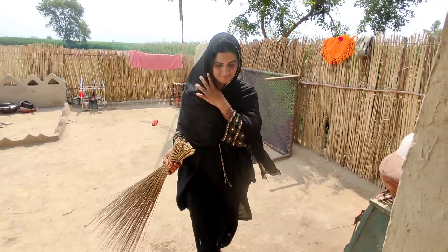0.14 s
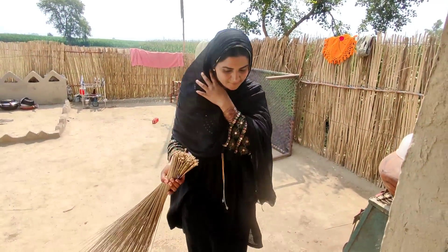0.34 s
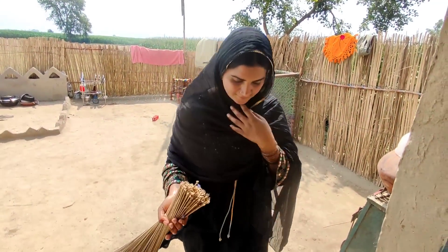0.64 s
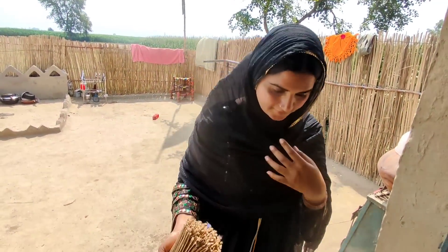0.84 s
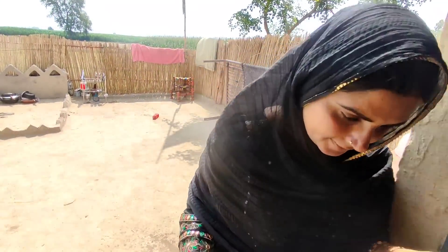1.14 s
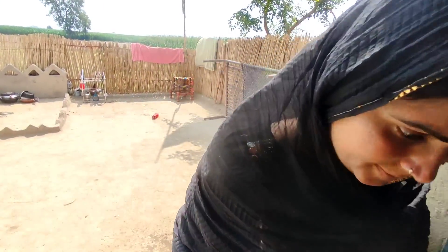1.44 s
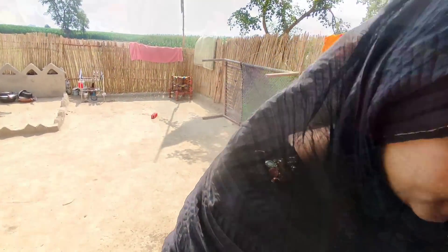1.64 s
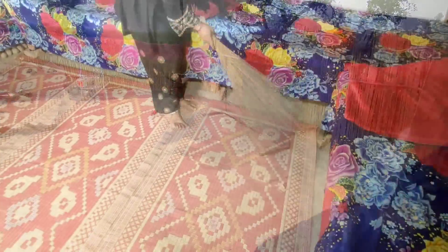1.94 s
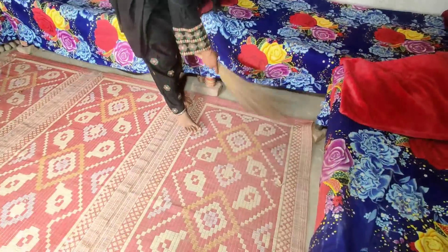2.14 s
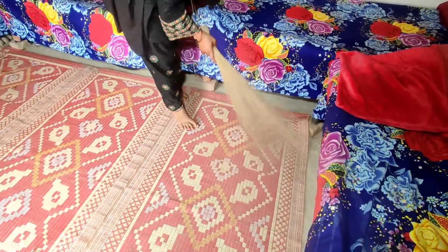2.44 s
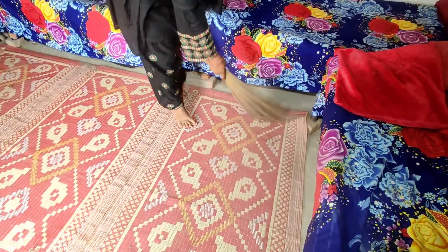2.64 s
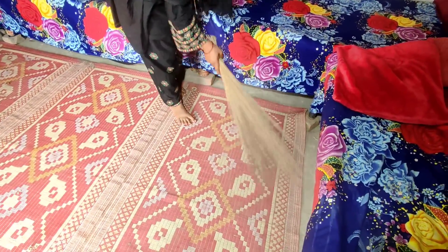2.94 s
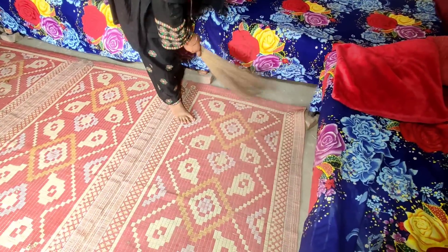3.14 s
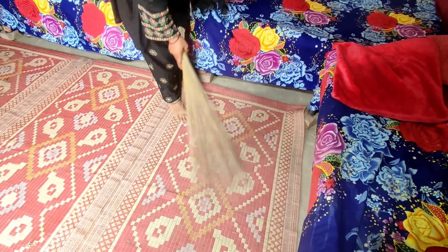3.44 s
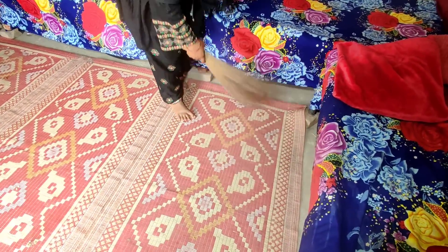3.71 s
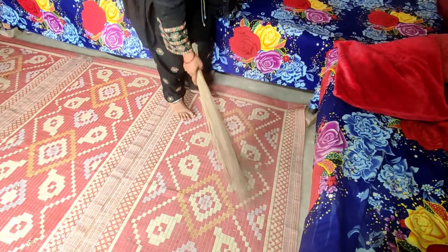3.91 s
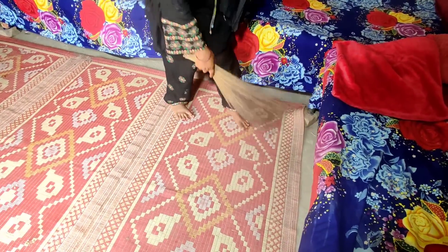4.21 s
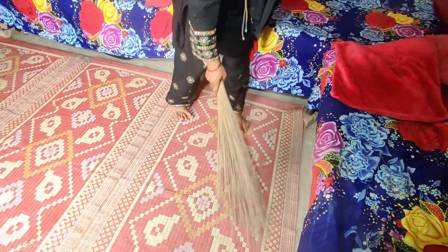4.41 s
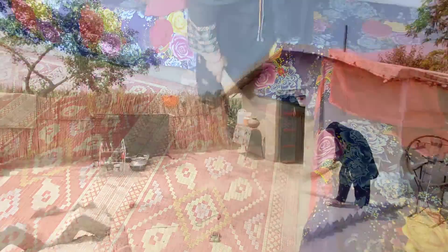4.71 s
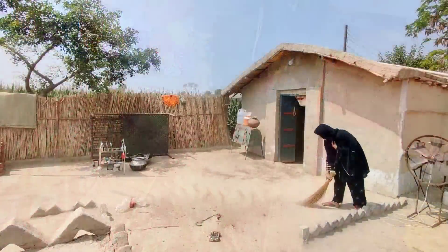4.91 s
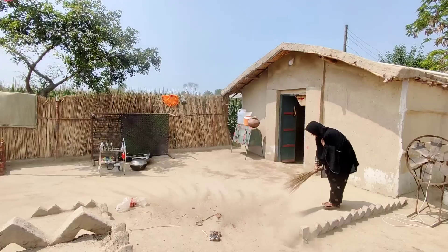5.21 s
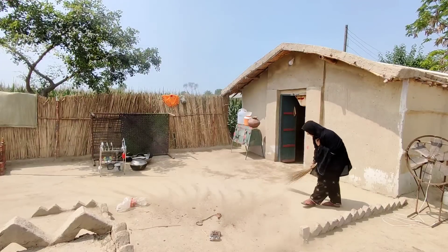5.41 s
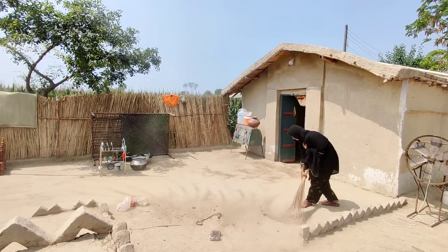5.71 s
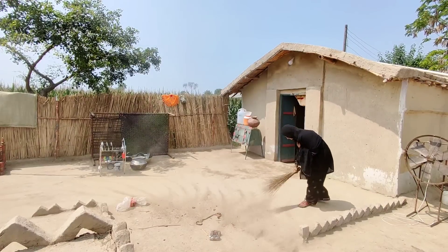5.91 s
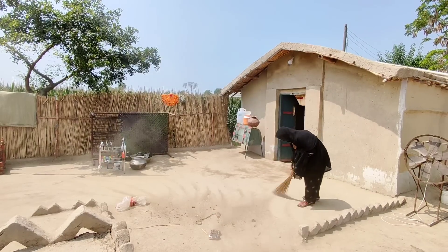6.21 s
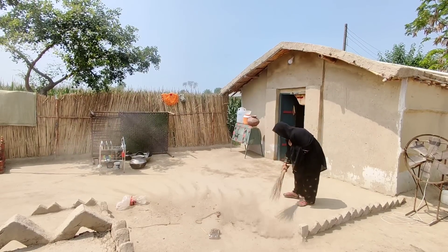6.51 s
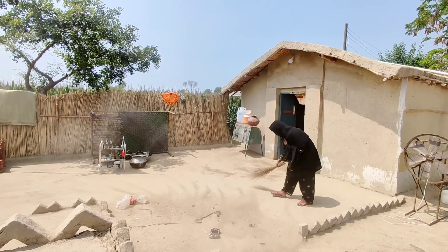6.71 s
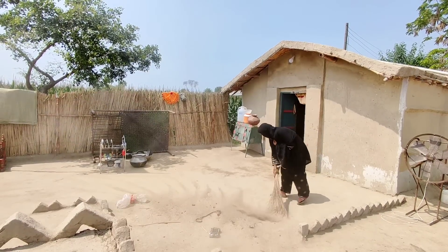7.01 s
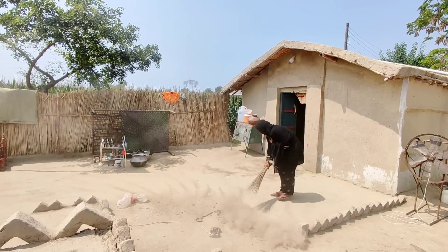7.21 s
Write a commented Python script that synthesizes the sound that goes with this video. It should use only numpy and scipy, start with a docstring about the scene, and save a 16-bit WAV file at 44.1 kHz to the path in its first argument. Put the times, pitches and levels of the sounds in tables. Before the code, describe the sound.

A grass broom sweeps briskly over a woven mat in a small room, then more faintly over packed earth outdoors.

```python
"""Sweeping a room, then a courtyard.

Close to a stereo microphone, a grass broom sweeps briskly over a woven floor mat: the tips hiss, the stalks
rasp. The room is small, and a ceiling fan hums and throbs. It fades into an open courtyard, where the broom,
farther off, scratches over packed earth. Before the sweeping come a few handling taps, a footstep and one
faint, distant bird call. Low drones swell far away, and a draught puffs on the microphone."""
import sys
import numpy as np
from scipy import signal
from scipy.fft import rfft, irfft, next_fast_len
from scipy.io import wavfile
from scipy.ndimage import uniform_filter1d, map_coordinates

SR = 44100
rng = np.random.default_rng(int(sys.argv[2]) if len(sys.argv) > 2 else 0)


def unload_wav(signal):
    """Save mono or channel-first audio to the path in sys.argv[1] as 16-bit WAV at rate SR, clipped to [-1, 1]."""
    wavfile.write(
        sys.argv[1],
        SR,
        np.round(np.clip(np.atleast_2d(signal).T, -1, 1) * 32767).astype(np.int16),
    )


N = 324165
TIME = np.arange(N) / SR

# Strokes on the mat. Each row: fastest moment, rise and fall in seconds, level and stalk rasp in dB.
MAT_STROKES = [(1.885, 0.086, 0.1, -33, -0.5), (2.385, 0.12, 0.099, -21, -1.5),
               (2.912, 0.14, 0.059, -19.5, 1), (3.435, 0.13, 0.079, -19.5, -2),
               (3.938, 0.077, 0.098, -20, -1), (4.431, 0.077, 0.11, -22, 0), (4.9, 0.057, 0.14, -31, -3)]
# Strokes on earth. Each row: fastest moment, rise and fall in seconds, level in dB.
YARD_STROKES = [(5.005, 0.073, 0.18, -38), (5.733, 0.11, .121, -38.5), (6.367, 0.088, 0.15, -38),
                (7.032, 0.09, 0.14, -37.5)]
# Light drags between strokes. Each row: middle and length in seconds, level in dB.
MAT_DRAGS = [(1.51, 0.15, -53), (1.74, 0.12, -42), (2.1, 0.59, -44.5), (2.68, 0.12, -36), (3.02, 0.12, -35),
             (3.19, 0.12, -33), (3.57, .11, -36), (4.12, 0.43, -39), (4.61, 0.046, -41.5)]
YARD_DRAGS = [(5.58, .05, -55), (5.9, 0.2, -54), (7.27, 0.13, -59)]
# Colour of the brushing at the microphone. Each row: frequency in Hz, left and right gain in dB.
MAT_COLOUR = [(400, -31.5, -26), (730, -29.5, -33), (1385, -21.5, -21.5), (2140, -17, -10.5),
              (4000, -16, -9), (4600, -16, -12), (5780, -13.5, -9.5), (6800, -15.5, -2.5), (7250, -10, 0.5),
              (8410, -13.5, -13.5), (9200, -13.5, -14.5), (9560, -31, -10.5), (10900, -17.5, -14),
              (12800, -15.5, -13.5)]
EARTH_COLOUR = [(400, -20.5, -20), (800, -13.5, -17), (1390, -12, -15), (1830, -2.5, -6.5),
                (2720, -9.5, -8.5), (3540, -7.5, -5), (4350, -6, -5.5), (6360, -3, -1), (7400, -4.5, -1.5),
                (8700, 2, -21), (9600, -9.5, -7.5), (10850, -9, -15.5), (13050, 0, -4.5),
                (14900, -16, -15.5)]
# Dry handling taps and the thud of a footstep. Each row: start in seconds, relative peak in dB, centre in Hz,
# width in octaves, # seconds to fall 60 dB, left over right in dB.
TAPS_AND_THUD = [(.1305, -27.5, 1310, 1.34, 0.0057, -13.5), (.518, -29, 2760, 0.61, 0.045, -6),
                 (1.331, -34, 394, 1.7, .14, 0), (1.629, -43.5, 2200, 0.55, .025, -9),
                 (6.065, -38.5, 1900, 1, 0.026, 5)]
# Bangles tink and sandals scuff the earth. Each row: start in seconds, relative peak in dB.
BANGLE_TINKS = [(.14, -49), (.382, -56)]
SANDAL_SCUFFS = [(5.893, -39.5), (5.941, -43.5), (6.655, -51), (7.289, -44.5)]
# Cloth and straw, and the scuff of a footstep. Each row: middle in seconds, level in dB, half length in
# seconds, centre in Hz.
RUSTLES = [(0.212, -61, 0.032, 6960), (.775, -67.5, 0.043, 6500), (.917, -57.5, 0.024, 6800),
           (1.03, -68.5, .098, 6750), (1.347, -44.5, 0.018, 2720)]
# The room's echo. Each row: frequency in Hz, seconds to fall 60 dB.
WALL_DECAY = [(200, 0.097), (2000, 0.23), (12000, 0.15)]
# The fan's blades. Each row: time in seconds, turns made.
FAN_TURNS = [(-.25, -1), (1.96, 6), (2.34, 7), (5.17, 16)]
# The fan's rush. Each row: time in seconds, level in dB.
FAN_RUSH_LEVEL = [(1.8, -55), (2.3, -51), (3.5, -50.5), (4.6, -54)]
# Air indoors, outdoors and on the microphone. Each row: frequency in Hz, relative level in dB.
ROOM_AIR = [(60, -24.5), (110, -20), (175, -3.5), (250, -7.5), (330, -7), (420, -13), (700, -14.5),
            (1400, -16), (2000, -18.5), (3000, -23), (5000, -29), (7300, -27.5), (9000, -38.5),
            (14400, -38.5)]
YARD_AIR = [(100, -15), (200, -13.5), (320, -14.5), (600, -18), (1200, -20), (1700, -19.5), (2500, -21),
            (4000, -24.5), (8000, -36), (14400, -49)]
DRAUGHT_RUMBLE = [(10, -1), (20, 3), (45, -3.5), (65, -10.5), (85, -14), (130, -22.5), (200, -53),
                  (400, -90)]
# Puffs of air on the microphone. Each row: middle and half length in seconds, level in dB.
PUFFS = [(.6, 1, -50.5), (2.2, 0.11, -48), (4.053, 0.13, -42), (4.467, 0.21, -42), (5.103, .2, -47),
         (6.477, 0.094, -48.5), (7.1, .25, -57)]
# Far drones. Each row: middle and half length in seconds, pitch in Hz, level in dB.
DRONES = [(.8, 1.14, 84.2, -61), (0.898, 1.4, 149.4, -60.5), (5.896, 0.94, 64.1, -53)]
# How alike left and right are. Each row: frequency in Hz, likeness from 0 to 1.
ROOM_LIKENESS = [(30, 0.58), (65, 0.62), (110, 1), (200, 1), (400, 1), (800, 0.45), (1400, 0.083),
                 (2400, 0.23), (4000, 0.014)]
YARD_LIKENESS = [(100, 0.45), (300, 0.77), (1400, 0.35), (5000, 0)]


def mat_broom(gain_db=0.93, resting_db=-47.5, firm_db=-23, ease_db_per_s=22, drag_rasp_db=1):
    """Quick strokes close to the microphone; between them the tips never quite leave the mat."""
    strokes = [stroke_power(s, rise, fall, db) for s, rise, fall, db, _ in MAT_STROKES]
    light = drag_power(MAT_DRAGS) + amp(resting_db) ** 2 * np.interp(TIME, [1.64, 1.72], [.1, 1])
    power = sum(strokes) + light
    level_db = 10 * np.log10(power)
    # the stalks bite as a stroke begins and ease off as it follows through
    bite = sum(stroke * (rasp_db - ease_db_per_s * (TIME - s))
               for stroke, (s, *_, rasp_db) in zip(strokes, MAT_STROKES))
    pressure_db = (bite + drag_rasp_db * light) / power
    speed_db = np.maximum(level_db - firm_db, -18)
    friction = bristles(level_db, flicks_per_s=10000, scatter_db=3.5, hiss=1.33, judder_db=0.72)
    friction = stalk_rings(friction, patchy_db=2.0)
    # slow or hard-pressed stalks rasp; a fast stroke draws a thin zing from the weave
    sound = brush(friction, MAT_COLOUR, ROOM_LIKENESS, pressure_db - 0.035 * speed_db, split_hz=2760)
    sound = lifted(sound, 0.25 * speed_db, centre_hz=6900, octaves=0.3)
    fade = np.interp(TIME, [1.4, 1.45, 4.95, 5.06], [0, 1, 1, 0])
    return fade * amp(level_db + gain_db) * sound


def yard_broom(resting_db=-68, trail_db=-22, trail_stretch=2.1, firm_db=-43, dust_db=3):
    """Slower strokes, farther off, through dust on hard earth; stray tips touch early and trail late."""
    strokes = sum(stroke_power(s, rise, fall, db)
                  + stroke_power(s, trail_stretch * rise, trail_stretch * fall, db + trail_db)
                  for s, rise, fall, db in YARD_STROKES)
    level_db = 10 * np.log10(strokes + drag_power(YARD_DRAGS) + amp(resting_db) ** 2)
    rise_db_per_s = np.gradient(uniform_filter1d(level_db, size=4000)) * SR
    landing = np.clip(rise_db_per_s / 150, 0, 1)
    friction = bristles(level_db, flicks_per_s=12000, scatter_db=3.5, hiss=1.33, judder_db=0.73)
    friction = stalk_rings(friction, patchy_db=2.5)
    sound = brush(friction, EARTH_COLOUR, YARD_LIKENESS, -dust_db * landing, split_hz=700)
    # the tips land first with a bright, dusty hiss; the trailing drag is dull
    bright_db = 2 * dust_db * landing + 0.072 * np.minimum(level_db - firm_db, 0)
    sound = lifted(sound, bright_db, centre_hz=13600, octaves=0.18)
    return np.interp(TIME, [4.86, 4.96], [0, 1]) * amp(level_db) * sound


def stroke_power(s, rise, fall, db, ends_down_db=10):
    """One pass of the broom: it gathers speed, peaks and slows."""
    return amp(db - ends_down_db * ((TIME - s) / np.where(TIME < s, rise, fall)) ** 2) ** 2


def drag_power(rows):
    """Light, even drags of the broom between strokes."""
    return sum(stroke_power(s, length / 2, length / 2, db) for s, length, db in rows)


def bristles(level_db, flicks_per_s, scatter_db, hiss, judder_db):
    """Straw tips catch and flick free, more of them in a harder stroke, over a smooth sliding hiss."""
    rate = flicks_per_s * amp((level_db - level_db.max()) / 4)
    caught = rng.random(N) < rate / SR
    size = amp(scatter_db * (2 * rng.random(N) - 1))
    ticks = unit(caught * size * rng.standard_normal((2, N)) / np.sqrt(rate))
    friction = unit(ticks + hiss * rng.standard_normal((2, N)))
    # whole tufts judder as the bundle drags
    return friction * amp(judder_db * (wobble(220) + wobble(45) / 2))


def stalk_rings(friction, patchy_db):
    """Ever different stalks bend and ring, so narrow bands of the brushing come and go."""
    bands = signal.stft(friction, nperseg=1024)[2]
    patches = uniform_filter1d(rng.standard_normal(bands.shape), size=4, axis=1)
    patches = uniform_filter1d(patches, size=9, axis=2)
    return signal.istft(bands * amp(patchy_db * unit(patches)), nperseg=1024)[1][:, :N]


def brush(friction, colour, likeness, rasp_db, split_hz):
    """Fine tips give the hiss, stiffer stalks the rasp below the split."""
    wide = stereo(friction, likeness)
    sound = unit(filtered(wide, lambda hz: amp([along(colour, hz, 1), along(colour, hz, 2)])))
    rasp = filtered(sound, lambda hz: 1 / (1 + (hz / split_hz) ** 6))
    return sound + (amp(rasp_db) - 1) * rasp


def small_contacts(gain_db=-3):
    """Handling taps, a footstep's thud, tinks of bangles and scuffs of sandals."""
    taps = sum(contact(*row) for row in TAPS_AND_THUD)
    tinks = sum(contact(s, db, centre_hz=10100, octaves=.07, t60=0.12) for s, db in BANGLE_TINKS)
    scuffs = sum(contact(s, db, centre_hz=1610, octaves=0.57, t60=0.14, side_db=9.5)
                 for s, db in SANDAL_SCUFFS)
    return amp(gain_db) * (taps + tinks + scuffs)


def contact(s, db, centre_hz, octaves, t60, side_db=0):
    """A short dry contact: a burst that dies in its own band."""
    age = np.arange(SR // 4) / SR
    lead = SR // 100  # samples for the band to ring ahead of the burst
    noise = rng.standard_normal(len(age)) + rng.standard_normal((2, len(age)))
    burst = np.pad(noise * amp(-60 * age / t60), [(0, 0), (lead, 0)])
    band = hump(np.fft.rfftfreq(SR // 2, 1 / SR), centre_hz, octaves)
    tap = irfft(rfft(burst, SR // 2) * band)
    tap = amp(db) * pan(side_db) * tap / np.abs(tap).max()
    return np.pad(tap, [(0, 0), (round(s * SR) - lead, N)])[:, :N]


def rustles(octaves=1.6, side_db=-7):
    """Cloth and straw shift softly and a foot scuffs, right of the microphone, before the work starts."""
    friction = bristles(np.zeros(N), flicks_per_s=1500, scatter_db=5, hiss=0.99, judder_db=1.0)
    return pan(side_db) * sum(
        amp(db) * swell(s, half) * unit(filtered(friction, lambda hz: hump(hz, centre_hz, octaves)))
        for s, db, half, centre_hz in RUSTLES)


def bird(start_s=.89, length_s=0.25, pitch_hz=1400, arch_hz=140, rough_hz=95, db=-54, side_db=3):
    """One hoarse, arching call from far away, a little to the left."""
    arch = np.sin(np.pi * np.clip((TIME - start_s) / length_s, 0, 1))
    phase = 2 * np.pi * np.cumsum(pitch_hz + arch_hz * arch + rough_hz * wobble(700)) / SR
    return pan(side_db) * amp(db + 0.67 * wobble(150)) * np.sqrt(np.abs(arch)) * np.sin(phase)


def walls(sound):
    """The short answer of a small room's walls, lingering longest in the midrange."""
    hz, age, bands = signal.stft(rng.standard_normal((2, SR // 2)), SR, nperseg=256)
    decay = amp(-60 * age / along(WALL_DECAY, hz)[:, None])
    tail = signal.istft(bands * decay, SR, nperseg=256)[1]
    return signal.fftconvolve(sound, tail / np.linalg.norm(tail[0]), axes=1)[:, :N]


def ceiling_fan(mains_hz=50.2, trough=0.22, throb_db=-51.5, steady_db=-58, flutter_rad=0.23):
    """Rushing air and mains hum: one harmonic throbs with every turn of the blades, one only wavers."""
    blown = amp(curve(FAN_RUSH_LEVEL)) * rush(ROOM_AIR, ROOM_LIKENESS) * pan(-3)
    phase = 2 * np.pi * np.cumsum(mains_hz + 0.15 * wobble(5.96)) / SR
    throb = trough + (1 - trough) * np.cos(np.pi * curve(FAN_TURNS)) ** 4

    def harmonic(order):
        return np.sqrt(2) * np.sin(order * phase + flutter_rad * wobble(30)) * amp(1.4 * wobble(7.01))

    return blown + amp(throb_db) * throb * harmonic(4) + amp(steady_db) * harmonic(6)


def yard_air(db=-62):
    """The faint, wavering hush of the open courtyard."""
    return amp(db + 1.7 * wobble(3.95)) * rush(YARD_AIR, YARD_LIKENESS)


def draught(steady_db=-51):
    """A light draught rumbles and puffs on the microphone, indoors and out."""
    puffs = sum(amp(db) * swell(s, half) for s, half, db in PUFFS)
    flow = np.hypot(amp(steady_db), puffs) * amp(1.1 * wobble(4.3))
    return flow * rush(DRAUGHT_RUMBLE, ROOM_LIKENESS) * pan(2.4)


def drones():
    """Low drones, as of distant engines, swell and recede."""
    out = np.zeros(N)
    for s, half, pitch_hz, db in DRONES:
        phase = 2 * np.pi * np.cumsum(pitch_hz + 5 * wobble(30)) / SR
        out += np.sqrt(2) * amp(db + 1.85 * wobble(7.9)) * swell(s, half) * np.sin(phase)
    return out


def rush(spectrum, likeness):
    """Coloured stereo noise of rms 1."""
    noise = stereo(rng.standard_normal((2, N)), likeness)
    return unit(filtered(noise, lambda hz: amp(along(spectrum, hz))))


def stereo(pair, likeness):
    """Blend two unrelated signals into left and right of the given likeness."""
    angle = lambda hz: np.arccos(np.clip(along(likeness, hz), -1, 1)) / 2
    mid, side = filtered(pair, lambda hz: np.array([np.cos(angle(hz)), np.sin(angle(hz))]))
    return np.array([mid + side, mid - side])


def pan(db):
    """Channel gains for left over right in dB."""
    return amp([[db / 2], [-db / 2]])


def lifted(sound, lift_db, centre_hz, octaves):
    """Raise or lower one band over time."""
    return sound + (amp(lift_db) - 1) * filtered(sound, lambda hz: hump(hz, centre_hz, octaves))


def filtered(sound, response):
    """Apply a gain that depends on frequency."""
    size = next_fast_len(N + SR // 2)
    return irfft(rfft(sound, size) * response(np.fft.rfftfreq(size, 1 / SR)), size)[..., :N]


def hump(hz, centre_hz, octaves):
    """A rounded band with gain 1 at its centre."""
    return 1 / (1 + (np.log2((hz + 1) / centre_hz) / octaves) ** 2) ** 2


def along(rows, hz, column=1):
    """One column of a table, read on a log-frequency axis."""
    table = np.array(rows, float)
    return np.interp(np.log(hz + 1), np.log(table[:, 0] + 1), table[:, column])


def curve(rows):
    """One value per sample from rows of time and value."""
    return np.interp(TIME, *np.transpose(rows))


def swell(s, half):
    """A smooth rise and fall around a moment."""
    return np.exp(-((TIME - s) / half) ** 2)


def wobble(rate):
    """A smooth random curve, rate knots a second."""
    return map_coordinates(rng.standard_normal(int(N * rate / SR) + 4), [TIME * rate], mode="nearest")


def amp(db):
    """Decibels to gain."""
    return 10 ** (np.asarray(db) / 20)


def unit(x):
    """Scale to rms 1."""
    return x / np.sqrt(np.mean(x ** 2) + 1e-20)


def scene(wet_db=-17, bird_wet_db=-2, fade_start_s=4.52, fade_end_s=5.25):
    """Near sounds and a far bird between the walls; then the room fades into the courtyard."""
    near = mat_broom() + small_contacts() + rustles()
    call = bird()
    echo = walls(amp(wet_db) * near + amp(bird_wet_db) * call)
    far_broom = yard_broom()
    outdoors = np.interp(TIME, [fade_start_s, fade_end_s], [0, 1])
    air = (1 - outdoors) * ceiling_fan() + outdoors * yard_air()
    return near + call + echo + far_broom + air + draught() + drones()


def record(dry, top_hz=14400, edge_hz=200):
    """The recorder keeps nothing above its band limit."""
    return filtered(dry, lambda hz: np.clip((top_hz - hz) / edge_hz + .5, 0, 1))


dry = scene()
out = record(dry)
unload_wav(out)
```